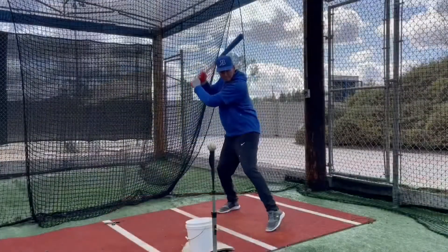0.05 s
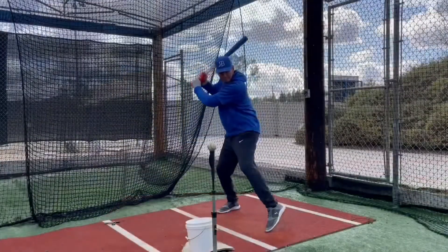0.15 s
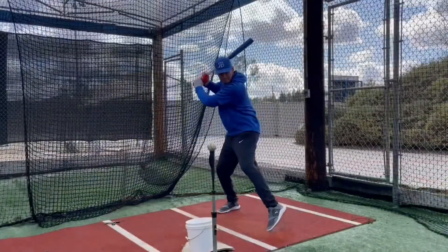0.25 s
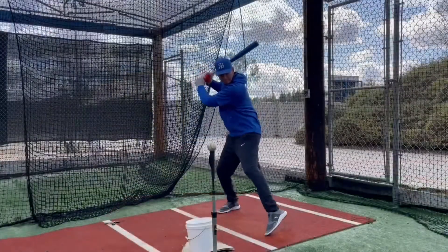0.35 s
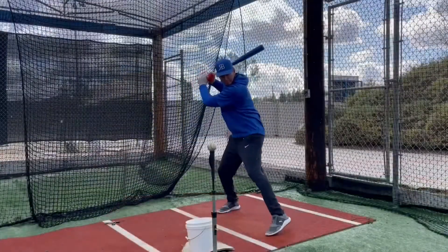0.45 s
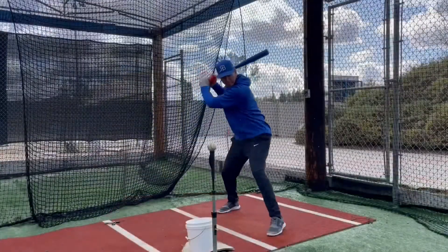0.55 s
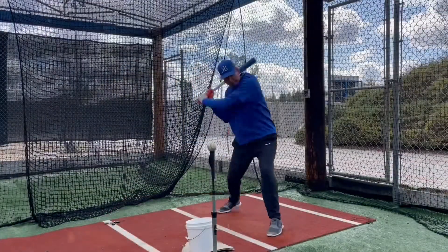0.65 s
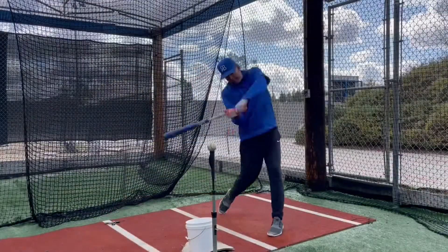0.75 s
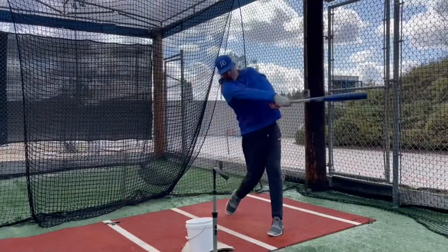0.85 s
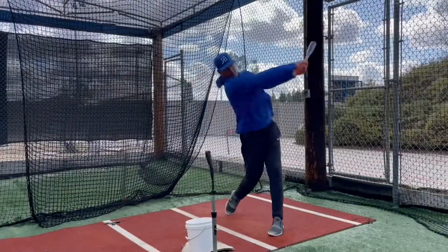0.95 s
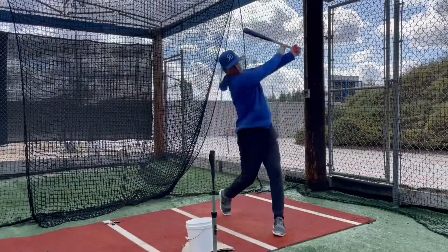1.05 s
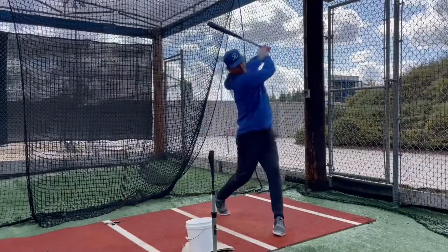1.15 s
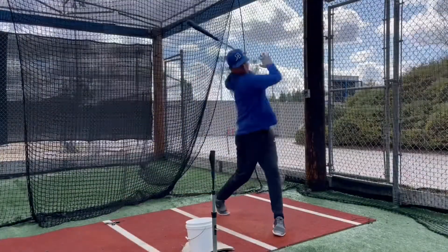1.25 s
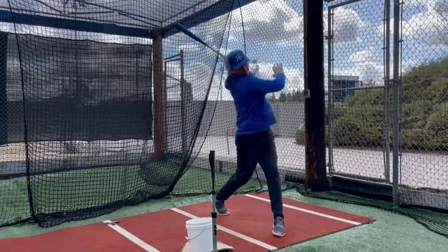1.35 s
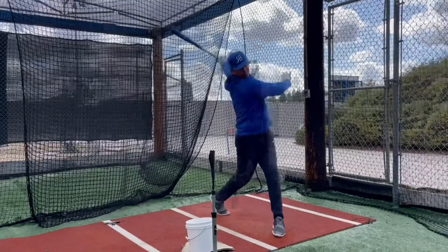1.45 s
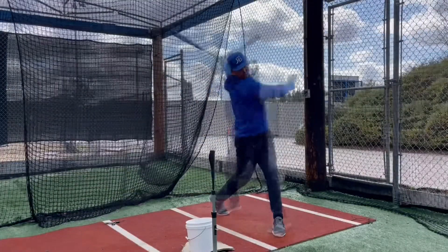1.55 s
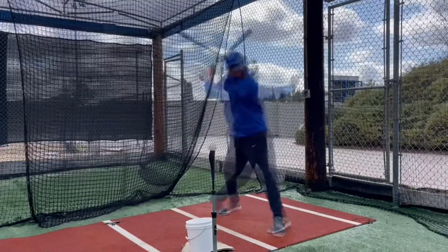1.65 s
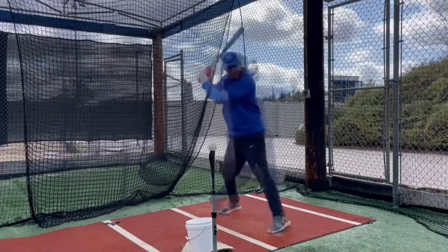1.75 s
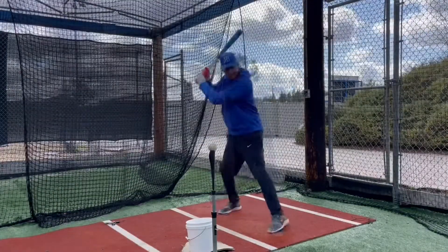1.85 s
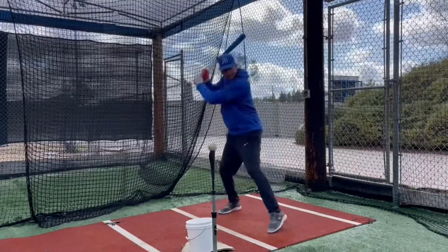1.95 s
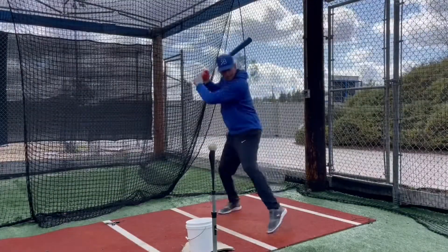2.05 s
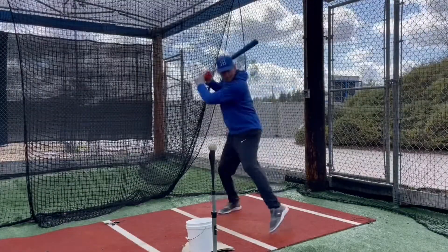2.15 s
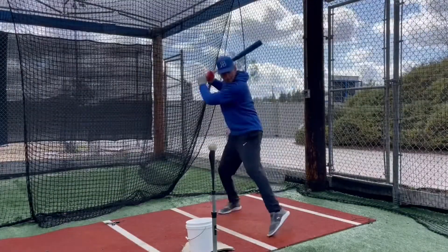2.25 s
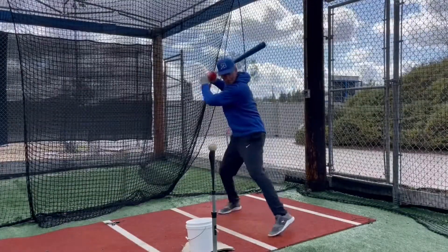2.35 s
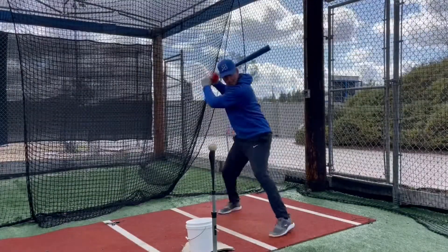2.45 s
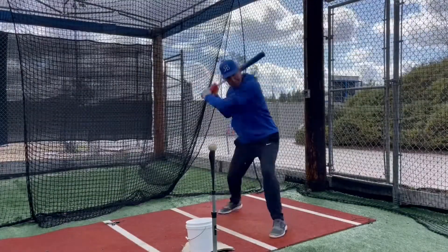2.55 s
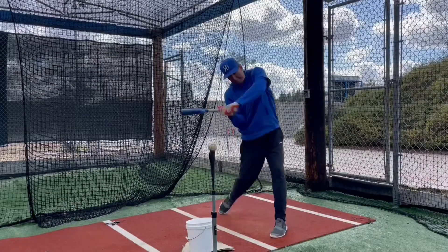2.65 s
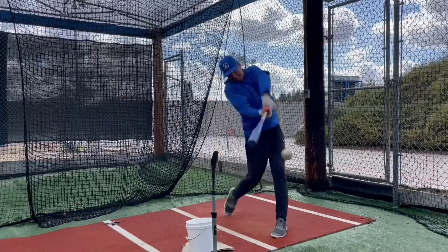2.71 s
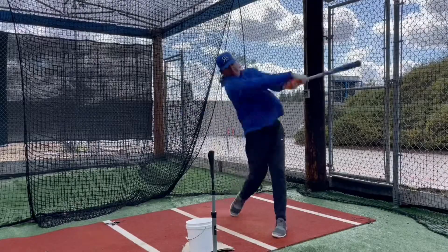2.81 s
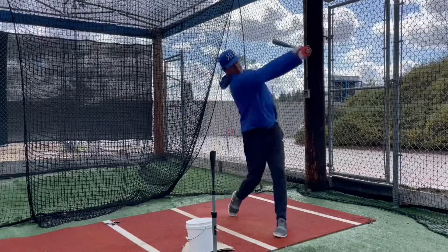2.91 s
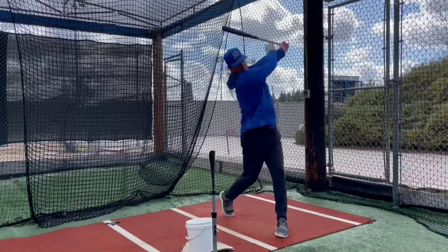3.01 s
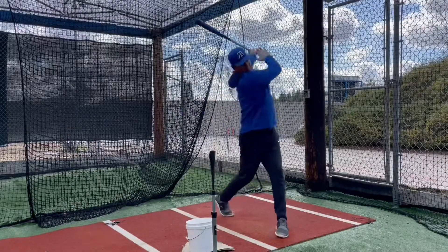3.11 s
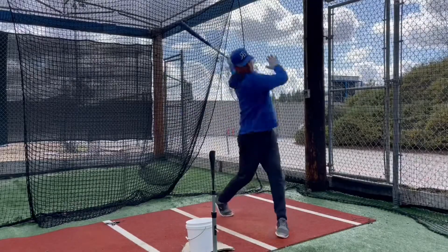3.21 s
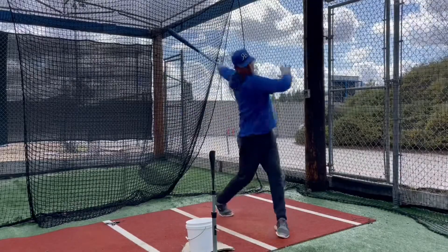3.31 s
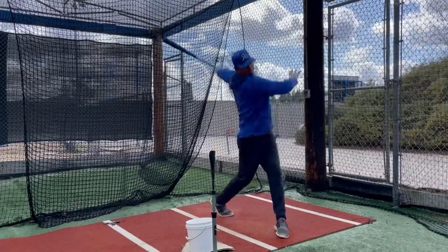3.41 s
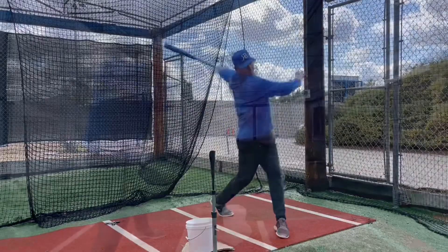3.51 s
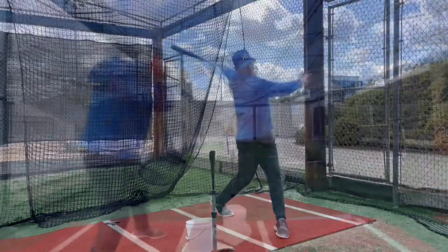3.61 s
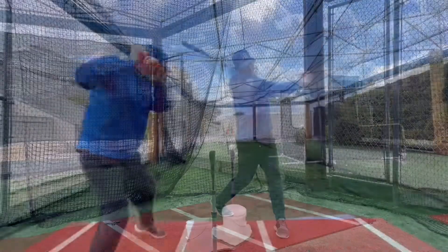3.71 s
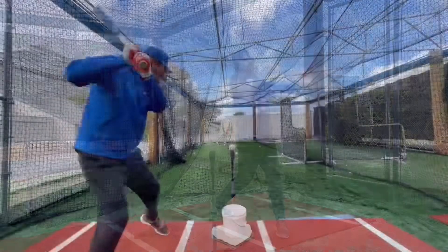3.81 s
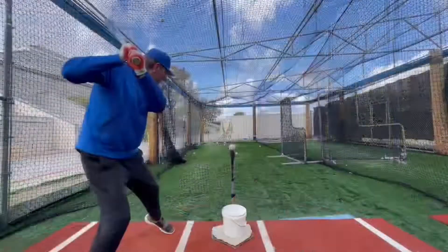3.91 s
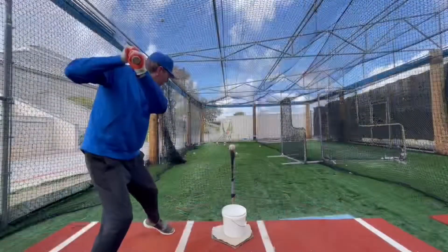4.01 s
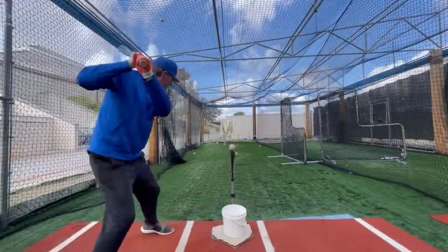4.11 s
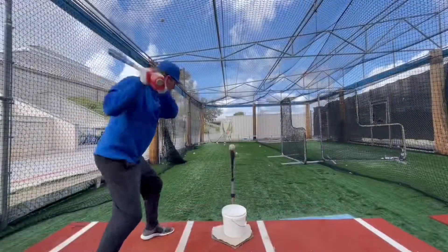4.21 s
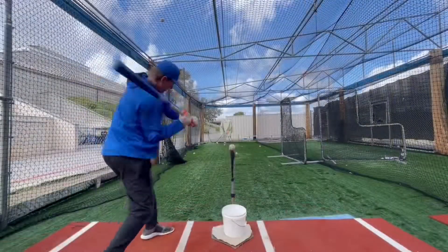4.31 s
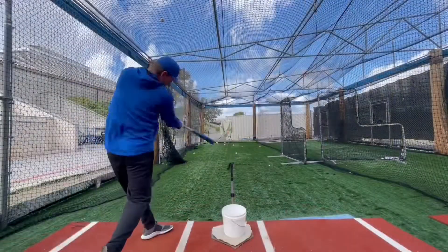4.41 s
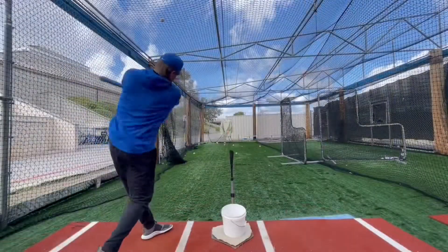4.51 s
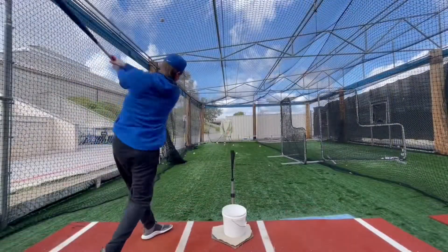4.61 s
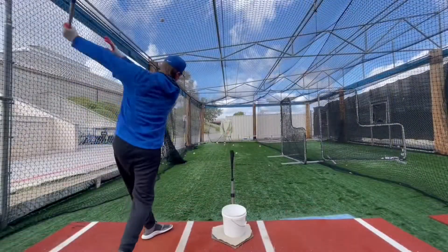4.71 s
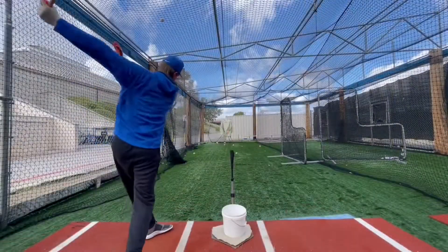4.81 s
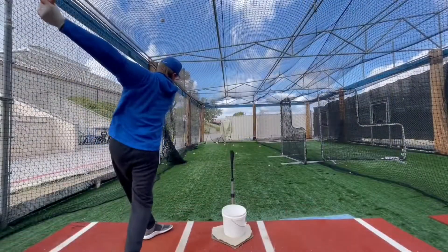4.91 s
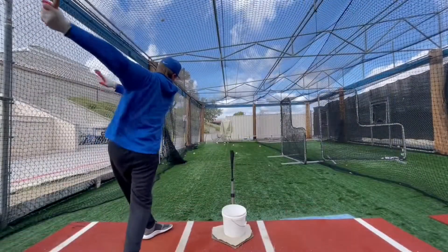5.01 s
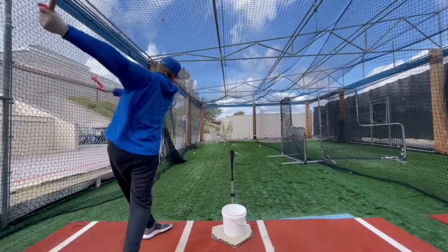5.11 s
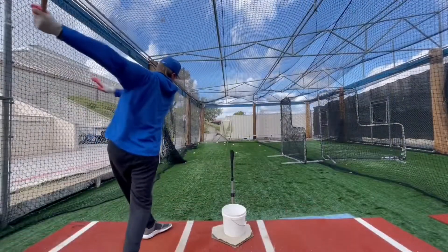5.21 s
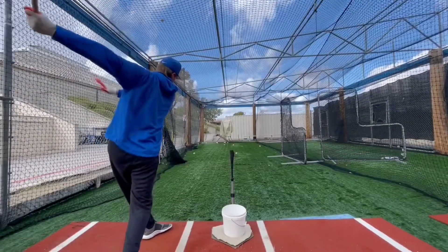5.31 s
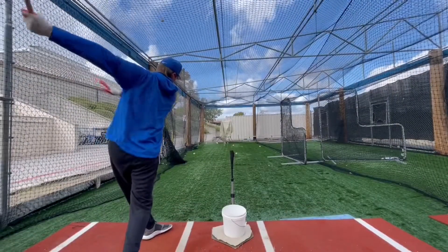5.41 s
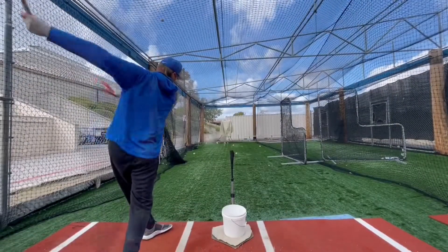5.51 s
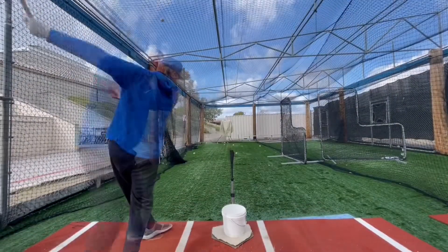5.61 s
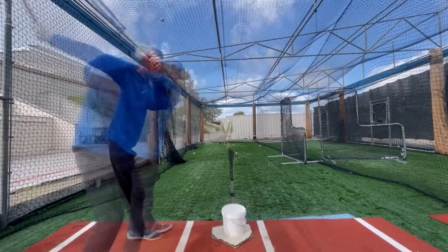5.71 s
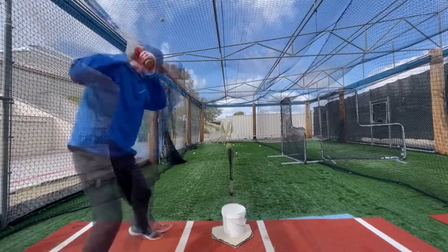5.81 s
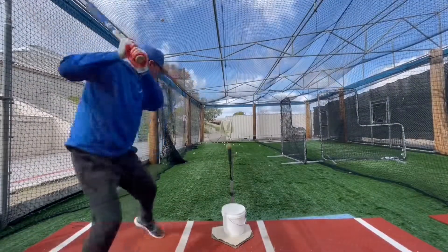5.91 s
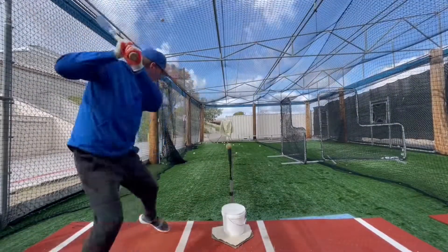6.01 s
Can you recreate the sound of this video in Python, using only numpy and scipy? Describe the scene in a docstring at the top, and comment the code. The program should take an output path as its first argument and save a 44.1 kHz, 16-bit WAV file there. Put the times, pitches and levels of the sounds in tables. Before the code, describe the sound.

Outdoors in a batting cage, a heavy bat cracks three balls off a tee, with netting clinks, jacket rustle, low wind rumble and distant traffic.

```python
"""Batting cage, three swings off a tee

Outdoors at the edge of a cage, a heavy bat knocks three baseballs off a tee: two heard from the side,
the last from close behind. Each crack is damped sines and noise, echoed by mat, walls and far yard.
Ringing clips and rubbing cords make the netting clink and rustle; shaped hiss makes the batter's jacket.
Filtered noise gives wind on the microphone and distant traffic; a far machine starts to hum near the end."""
import sys
import numpy as np
from scipy import signal
from scipy.fft import rfft, irfft
from scipy.io import wavfile
from scipy.ndimage import uniform_filter1d

SR = 44100
rng = np.random.default_rng(int(sys.argv[2]) if len(sys.argv) > 2 else 0)


def to_wav(sig):
    """Store sig (one row per channel, or 1-D mono) as 16-bit WAV at the path in sys.argv[1].

    Samples outside -1..1 are clipped; the rate is SR.
    """
    pcm = np.clip(np.atleast_2d(sig), -1, 1) * 32767
    pcm = np.round(pcm).astype(np.int16)
    wavfile.write(sys.argv[1], SR, pcm.T)  # frames by channels


N = 266845
T = np.arange(N) / SR
TOP_HZ = 16000

# colour of the distant traffic: (frequency [Hz], level [dB])
TRAFFIC_TONE = [(200, -6.5), (450, 1), (800, 4.5), (1200, -6.5), (2000, -20), (3500, -31), (8000, -60)]
# brief dips in the level of the distant wash: (time [s])
DIPS = [1.69, 3.71, 5.55]
# faint distant chirps: (time [s], length [s], starting pitch [Hz], ending pitch [Hz], level [dB])
CHIRPS = [(1.29, .028, 1745, 1775, -49.5), (1.304, .034, 930, 1010, -48), (1.314, .02, 2000, 2030, -57),
          (1.505, .016, 1730, 1720, -59), (1.54, .022, 1680, 1800, -59), (1.562, .022, 1810, 1720, -56),
          (1.595, .03, 1710, 1710, -62), (3.668, .065, 1600, 1600, -58.5), (3.675, .055, 2450, 2450, -62)]

# wind strength: (time [s], gust level [dB], low rumble level before RUMBLE_DB [dB])
WIND = [(0.0, -30.5, -46.5), (0.34, -33.5, -48.5), (0.89, -34.5, -55.5), (1.25, -32.5, -41.5),
        (1.74, -45, -57.5), (2.68, -56, -48.5), (3.15, -53, -50), (3.39, -50, -56), (3.74, -59, -68),
        (4.09, -54.5, -67), (4.45, -48.5, -72), (6.05, -56, -63.5)]
# colours of gust and low rumble: (frequency [Hz], level [dB])
GUST_TONE = [(60, -8.5), (115, 0), (190, -1), (300, -5.5), (450, -10), (700, -23.5), (1500, -48)]
RUMBLE_TONE = [(20, -43), (35, -10.5), (60, 0), (100, -1.5), (150, -7.5), (300, -23)]
# strongest buffets of air on the microphone: (time [s], peak level [dB], frequency [Hz])
BUFFETS = [(1.06, -32.5, 59), (1.314, -24, 98), (1.884, -34, 55.3), (1.981, -25, 59), (2.067, -25, 120),
           (2.101, -32, 54), (2.27, -26.5, 82), (2.537, -27.5, 78.8), (2.582, -26.5, 69),
           (2.662, -28.5, 84), (2.841, -27.5, 74.3), (2.99, -25.5, 71.4), (3.079, -33.5, 65),
           (3.268, -28, 97), (4.385, -30.5, 69)]

# hum lines of the far machine: (frequency [Hz], relative level [dB])
MACHINE_LINES = [(477, 0), (716, -13), (1432, -21.5), (1860, -24), (1910, -17.5)]
# the one surge of its hum: (time [s], length [s], rise [dB])
MACHINE_SURGE = (6.01, 0.042, 5.7)
# colour of its rush of air: (frequency [Hz], level [dB])
MACHINE_RUSH_TONE = [(400, 11.0), (650, 8), (1400, -4.0), (2000, 1.5), (2400, -5.5), (3000, -27)]

# colour of the batter's jacket: (frequency [Hz], level [dB])
JACKET_TONE = [(1200, 8.5), (2500, -1), (4200, -1.5), (6500, -4), (8500, -23), (10200, -11.5), (12500, -4),
               (15500, -16.5)]
# cloth rustles before, between and after the swings: (time [s], length [s], level [dB])
RUSTLES = [(0.07, .2, -76.5), (1.922, 0.16, -90), (3.72, 0.14, -65), (5.42, 0.14, -59.5),
           (5.699, 0.13, -62.5)]

# sharp, dry ticks: (time [s], peak level [dB], frequency [Hz])
TICKS = [(1.105, -32, 6300), (1.165, -34, 4300), (1.287, -46, 6330), (1.315, -44, 2900), (1.514, -50, 2850),
         (2.864, -35.5, 4300), (2.886, -35, 3900), (3.039, -36, 5700), (3.08, -34, 2850),
         (3.104, -39, 5800), (4.556, -31, 2480), (5.149, -42, 9800), (5.452, -42, 8500)]

# uneven, fading surges of the rubbing cords: (time [s], length [s], level before panning [dB])
RUB_SURGES = [(4.88, 0.042, -39), (4.969, 0.078, -44), (5.078, 0.066, -53.5), (5.142, .06, -51.5),
              (5.258, .08, -55)]
# colours of the rubbing cords and of the mesh sliding beneath them: (frequency [Hz], level [dB])
RUB_TONE = [(1300, -2), (2200, -2.5), (3400, 1), (5400, -3), (6800, -2), (9800, 0), (11000, -12),
            (15000, -21)]
MESH_TONE = [(1300, 0), (2200, 1), (3400, 1), (5400, -8.5), (6800, -5.5), (9800, -10.5), (15000, -24)]

# balls caught by the net: (time [s], level [dB], cord shake relative to it [dB])
CATCHES = [(1.048, -30, -13.5), (2.977, -26.5, -17)]
# quick clashes of the clips at each catch: (lag [s], level [dB], left minus right [dB])
CLASHES = [(0, -9, 8), (.003, -0.5, -5), (.010, -9, 4)]
# ringing clips and wires: (frequency [Hz], t60 [s], level in first catch [dB], in second [dB])
CLIP_MODES = [(1960, 0.049, -9, -11), (2420, 0.036, -10, -13), (2616, 0.05, -5.5, -5), (2970, 0.015, 0, -7),
              (3250, 0.015, 2, -8), (4250, .018, -19, -18), (5200, 0.04, -16, -7), (5940, 0.019, 1.5, 2),
              (6340, 0.043, -12, -4), (6510, 0.034, -3, -26), (13500, 0.0039, -4, -9)]
# colour of the shaking cords: (frequency [Hz], level [dB])
CORD_TONE = [(1200, -7.5), (2800, 5), (4500, 0), (6200, 2.5), (8500, -21), (12500, -9.5), (15000, -27)]

# swings: (time [s], heard from, strength [dB], thock frequency [Hz], thock level [dB], thock t60 [s],
# mat bounce lag [s], mat bounce level [dB], tee knock level [dB], left minus right [dB],
# cage level [dB], yard level [dB], stride before the hit [s], jacket level [dB])
SWINGS = [(0.7603, "side", 0.5, 589, -3, 0.018, 0.0018, 1.5, -10, -1, -20, -39, 0.44, -60.5),
          (2.693, "side", -3.5, 627, -1, 0.02, 0.001827, 5.5, -30, 0.5, -25, -39.5, 0.481, -62.5),
          (4.3953, "rear", -2.5, 984, 2.4, 0.0076, 0.0021, 5, -16, -2, -28, -38.5, 0.462, -56.5)]
# bat and ball ring; where the ball meets the barrel sets each mode's share:
# (frequency [Hz], t60 [s], level in first swing [dB], in second [dB], in third [dB])
BAT_MODES = [(530, 0.0024, -30, -14.5, -3.5), (730, 0.06, -13, -20, -45), (1022, 0.031, -9.5, -9, -18.5),
             (1097, 0.047, -22.5, -36.5, -28.5), (1634, 0.031, -16, -28.5, -15),
             (2080, 0.0065, -6.5, -4, -7.5), (2475, 0.0057, -19.5, -13.5, -10.5),
             (3616, 0.022, -17.5, -22.5, -23.5), (4530, 0.013, -24, -33.5, -24.5),
             (6850, 0.0015, -14, -10.5, -14)]
# echo paths off walls and posts: (heard from, lag [s], level relative to the crack [dB],
# nominal upper edge [Hz], left minus right [dB], dull ring relative to the slap [dB])
ECHOES = [("side", .014, -25, 8000, 0, -14), ("side", .0398, -14, 4300, 3, -8),
          ("side", .048, -24, 3000, -2, -8), ("side", .0665, -20.5, 3600, -4, -4),
          ("side", .088, -29, 3200, 3, -12), ("side", .098, -25.5, 4700, 0, -11),
          ("side", .138, -26, 2200, 2, -4), ("side", .153, -23, 5000, 0, -11),
          ("side", .193, -28, 2200, -2, -6), ("side", .207, -26, 2700, 0, -8),
          ("rear", .0272, -15, 2500, 3, -13), ("rear", .033, -22, 2600, -2, -12),
          ("rear", .0665, -24, 3000, 0, -16), ("rear", .0965, -25, 3500, -3, -22),
          ("rear", .1405, -25, 5500, 0, -22), ("rear", .158, -24, 3800, 2, -22),
          ("rear", .164, -26, 2600, -2, -12), ("rear", .1805, -22, 2600, 0, -13),
          ("rear", .1945, -22.5, 2200, 0, -10)]
# colours of the close scatter in the cage and of the yard's echo: (frequency [Hz], level [dB])
CAGE_TONE = [(250, -3.5), (700, 8.5), (1200, 1), (2200, 0), (4200, -8.5), (6500, -11), (9000, -28.5),
             (13000, -9), (15500, -19)]
YARD_TONE = [(200, -8), (550, 3.5), (850, 6.5), (1200, 5.5), (2200, 6), (4200, -3.5), (6500, -11),
             (9000, -31), (13000, -44), (15500, -39)]
# treble balance of the side and rear cracks: (frequency [Hz], level [dB])
TREBLE_BALANCE = {"side": [(20, 0), (2600, -0.5), (3400, -0.5), (7000, 1.5), (8300, -8), (10600, -4.5),
                  (12500, 0), (16000, -1)], "rear": [(20, -1), (2600, -0.5), (4000, 1), (5400, 3),
                  (6700, 4.5), (7800, -2), (9500, 4), (11500, 1.5), (13500, -3), (16000, 0)]}

# stereo width of the microphone pair: (frequency [Hz], side level [dB])
WIDTH_TONE = [(20, -3.5), (70, 5), (160, -2.5), (600, 6), (3000, -2), (8500, 3.5), (11500, 0.5),
              (16000, -13.5)]

# the distant traffic grows slightly fainter from REAR_START_S on, ahead of the third, rear-heard swing
TRAFFIC_DB, REAR_START_S, REAR_TRAFFIC_DB = -50.5, 3.48, -1.5
DIP_S, DIP_DB = 0.37, -3
# rumble relative to the wind curve; the rumble that stays in calm air
RUMBLE_DB, CALM_RUMBLE_DB = 6.5, -54.5
BUFFET_CYCLES = 1.93
# the far machine starts up, then keeps swelling while its hum throbs unevenly
MACHINE_START_S, MACHINE_RISE_S, MACHINE_DB, MACHINE_DB_PER_S = 5.53, 0.075, -51.5, 18
MACHINE_THROB_DB = 2.5
# every swing runs alike: a shoe scuffs, the body coils, the arms whip through, the jacket settles;
# step, whip and settle levels are relative to the jacket
STEP_DB, STEP_T60_S = -1.5, 0.17
COIL_LEAD_S, COIL_S = 0.14, 0.23
WHIP_S, WHIP_DB = 0.077, 11.5
SETTLE_DB, SETTLE_T60_S, CLOTH_REST_DB = 4.5, 2.49, -76
# from close behind, the jacket's fine hiss carries too
CLOSE_HISS_DB = -9
# the side net snaps taut after the last swing, slides and flaps; later a soft swish follows
SNAP_S, SNAP_DB = 4.854, -23
RUB_DB, RUB_T60_S = -46.5, 2.32
FLAP_DB, FLAP_T60_S = -43, 2.54
SWISH_S, SWISH_LENGTH_S, SWISH_DB, SWISH_CORD_DB = 5.38, 0.085, -43, -55
# each slap has a slightly different dull ring; the spread is in log frequency
SLAP_RING_HZ, SLAP_RING_SPREAD = 920, .16
# the yard's echo builds, holds while the far fences answer, then dies away
YARD_RISE_S, YARD_HOLD_S, YARD_T60_S = .02, 0.14, 1
# seen down the lane, the end wall adds a grainy swell
END_WALL_LAG_S, END_WALL_S, END_WALL_DB = 0.19, 0.16, -43.5
# the crack's body reaches the left port this much before the right
PORT_LAG_S = .00005


def undb(db):
    """Decibels to gain."""
    return 10 ** (np.asarray(db) / 20)


def unit(x):
    """Scale to rms 1."""
    return x / np.sqrt(np.mean(x ** 2))


def fader(rows, axis=1):
    """Gain over time from one dB column of a curve."""
    rows = np.array(rows)
    return undb(np.interp(T, rows[:, 0], rows[:, axis]))


def pan(db):
    """Left and right gains for a level difference."""
    return undb(np.array([[db], [-db]]) / 2)


def colour(x, tone):
    """Filter by (frequency [Hz], level [dB]) points, falling steeply past both ends."""
    hz, db = np.transpose(tone)
    octave = np.log2(np.fft.rfftfreq(x.shape[-1], 1 / SR) + 1)
    below = np.maximum(np.log2(hz[0]) - octave, 0)
    above = np.maximum(octave - np.log2(hz[-1]), 0)
    gain = undb(np.interp(octave, np.log2(hz), db) - 20 * (below + above))
    return irfft(rfft(x) * gain, x.shape[-1])


def band(x, lo_hz, hi_hz):
    """Causal band-pass, its upper edge held to TOP_HZ."""
    return signal.sosfilt(signal.butter(2, [lo_hz, min(hi_hz, TOP_HZ)], "band", fs=SR, output="sos"), x)


def noise(width):
    """Stereo noise; width is the side signal relative to the middle."""
    mid, side = rng.standard_normal((2, N))
    return unit(np.array([mid + width * side, mid - width * side]))


def walk(rate):
    """Slow random drift with a spread near 1; rate is in steps per second."""
    k = max(int(SR / rate), 1)
    steps = np.repeat(rng.standard_normal(N // k + 1), k)
    return unit(uniform_filter1d(uniform_filter1d(steps, k), k)[:N])


def hump(s, length):
    """A smooth swell centred on s."""
    return np.exp(-(2 * (T - s) / length) ** 2)


def envelope(s, rise, t60, hold=0):
    """Rises from s, stays level until hold seconds after s, then dies away."""
    decay = undb(-60 * np.maximum(T - s - hold, 0) / t60)
    return np.clip((T - s) / rise, 0, 1) * decay


def fade(t60):
    """Exponential decay, half a second long."""
    return undb(-60 * T[:SR // 2] / t60)


def burst(t60, width=1):
    """A dying puff of stereo noise."""
    return noise(width)[:, :SR // 2] * fade(t60)


def ring(modes, lag_cycles=0):
    """Damped sines; each may start some of its own cycles late, so that the low ones come last."""
    out = 0
    for hz, db, t60 in modes:
        age = np.maximum(T[:SR // 2] - lag_cycles / hz, 0)
        out = out + undb(db - 60 * age / t60) * np.sin(2 * np.pi * hz * age)
    return out


def late(x, s):
    """The sound delayed by s seconds, on the full time line."""
    start = max(int(round(s * SR)), 0)
    return np.pad(x, [(0, 0)] * (x.ndim - 1) + [(start, N)])[..., :N]


def rattle(width):
    """Countless small echoes: each frequency band comes in its own irregular clumps."""
    edges_hz = [200, 700, 1300, 2200, 3500, 5500, 15500]
    out = 0
    for lo, hi in zip(edges_hz, edges_hz[1:]):
        clumps = undb(2.1 * walk(260) + 2.6 * walk(1100))
        out = out + band(noise(width) * clumps, lo, hi)
    return out


def distance():
    """Far off: a wash of traffic noise and a few thin, blurred chirps that glide a little."""
    rear = np.clip((T - REAR_START_S) / 0.26, 0, 1)
    dips = sum(hump(s, DIP_S) for s in DIPS)
    traffic_db = TRAFFIC_DB + REAR_TRAFFIC_DB * rear + DIP_DB * dips
    out = unit(colour(noise(width=0.7), TRAFFIC_TONE)) * undb(traffic_db + 0.43 * walk(3.3))
    flutter = undb(3 * walk(180))
    waver = 1 + .04 * walk(900) + .008 * walk(90)
    for s, length, start_hz, end_hz, db in CHIRPS:
        swell = envelope(s, length / 2, t60=0.13, hold=length) * flutter
        pitch = np.interp(T, [s, s + length], [start_hz, end_hz]) * waver
        out = out + undb(db) * swell * np.sin(2 * np.pi * np.cumsum(pitch) / SR)
    return out


def machine():
    """A far machine whose wavering hum swells with a rush of air."""
    age = T - MACHINE_START_S
    surge_s, surge_length, surge_db = MACHINE_SURGE
    effort = np.clip(age / MACHINE_RISE_S, 0, 1) * undb(MACHINE_DB + MACHINE_DB_PER_S * age)
    hum = 0
    for hz, db in MACHINE_LINES:
        throb = undb(db + MACHINE_THROB_DB * walk(55))
        pitch = hz * (1 + .013 * walk(90))
        hum = hum + throb * np.sin(2 * np.pi * np.cumsum(pitch) / SR)
    rush = unit(colour(noise(width=1.0), MACHINE_RUSH_TONE))
    return effort * (hum * undb(surge_db * hump(surge_s, surge_length)) + undb(-4) * rush)


def wind():
    """Turbulence at the microphone: a restless rumble and single lumpy buffets."""
    gust = unit(colour(noise(width=0.41), GUST_TONE)) * fader(WIND) * undb(1.4 * walk(14))
    pressure = fader(WIND, axis=2) * undb(RUMBLE_DB + 3.1 * walk(14)) + undb(CALM_RUMBLE_DB)
    rumble = unit(colour(noise(width=0.293), RUMBLE_TONE)) * pressure
    eddies = unit(band(noise(width=0.92), lo_hz=87, hi_hz=183.6))
    out = gust + rumble
    for s, db, hz in BUFFETS:
        push = np.cos(2 * np.pi * hz * (T - s)) + undb(-11.0) * eddies
        out = out + undb(db) * hump(s, BUFFET_CYCLES / hz) * push
    return out


def batter():
    """Cloth slips in tiny catches as the batter steps, coils, swings and settles."""
    cloth = unit(colour(noise(width=0.82) * undb(2 * walk(270)), JACKET_TONE))
    hiss = band(noise(width=1.0), lo_hz=8050, hi_hz=10200)
    hiss = unit(band(hiss, lo_hz=8050, hi_hz=10200))  # a second pass steepens the edges
    cloth = cloth + undb(CLOSE_HISS_DB) * hiss * np.clip((T - REAR_START_S) / 0.33, 0, 1)
    sole = unit(band(noise(width=1.0), lo_hz=4500, hi_hz=15400))
    motion = undb(CLOTH_REST_DB) + sum(undb(db) * hump(s, length) for s, length, db in RUSTLES)
    steps = 0
    for s, *_, stride_s, jacket_db in SWINGS:
        coil = hump(s - COIL_LEAD_S, COIL_S)
        whip = undb(WHIP_DB) * hump(s, WHIP_S)
        settle = undb(SETTLE_DB) * envelope(s, .02, SETTLE_T60_S)
        motion = motion + undb(jacket_db) * (coil + whip + settle)
        steps = steps + undb(jacket_db + STEP_DB) * envelope(s - stride_s, 0.0037, STEP_T60_S)
    return cloth * motion + sole * steps


def ticks():
    """Taps of the netting and a few crisp echoes of the cracks: short noise with a brief wiry ring."""
    out = 0
    for s, db, hz in TICKS:
        tap = band(burst(t60=0.034), hz / 1.33, hz * 1.03)
        wire = ring([(hz, 0, .05), (hz * .91, -2, .04)])
        tap = tap / np.abs(tap).max() + undb(-10) * wire
        out = out + late(undb(db) * tap / np.abs(tap).max(), s)
    return out


def side_net():
    """The net snaps, its cords rub in fading surges while the mesh slides and flaps; later a soft swish
    follows."""
    snap = band(burst(t60=0.021, width=1.0), lo_hz=1390, hi_hz=3650)
    grain = undb(2.2 * walk(500) + .8 * walk(45))
    cord = unit(colour(noise(width=0.9) * grain, RUB_TONE))
    mesh = unit(colour(noise(width=0.97) * grain, MESH_TONE))
    flap = unit(band(noise(width=1.07), lo_hz=270, hi_hz=1010))
    swish = hump(SWISH_S, SWISH_LENGTH_S)
    rubbing = sum(undb(db) * hump(s, length) for s, length, db in RUB_SURGES)
    sliding = undb(RUB_DB) * envelope(SNAP_S, 0.019, RUB_T60_S) + undb(SWISH_CORD_DB) * swish
    flapping = undb(FLAP_DB) * envelope(SNAP_S, 0.012, FLAP_T60_S) + undb(SWISH_DB) * swish
    rustle = cord * rubbing + mesh * sliding + flap * flapping
    return pan(4.8) * (rustle + undb(SNAP_DB) * late(snap / np.abs(snap).max(), SNAP_S))


def net():
    """The net catches a ball and snaps taut: clips clash in a tight cluster, then the cords shake out."""
    out = 0
    cords = unit(colour(rattle(width=0.9), CORD_TONE))
    for catch, (s, db, shake_db) in enumerate(CATCHES):
        clink = undb(1.5) * late(band(burst(t60=0.13, width=1.0), lo_hz=1630, hi_hz=6200), 0)
        for lag, clash_db, pan_db in CLASHES:
            # every clash strikes the clips at slightly different pitches
            detune = 1 + .012 * rng.standard_normal(len(CLIP_MODES))
            modes = [(hz * d, levels[catch], t60) for d, (hz, t60, *levels) in zip(detune, CLIP_MODES)]
            clink = clink + undb(clash_db) * pan(pan_db) * late(ring(modes), lag)
        clink = late(band(clink, lo_hz=1520, hi_hz=13700), s)
        shake = cords * late(fade(t60=0.76), s)
        out = out + undb(db) * (clink + undb(shake_db) * shake)
    return out


def slaps(place):
    """Single reflections of a crack, thinned and slightly smeared by rough surfaces."""
    out = 0
    for echo_place, lag, db, edge_hz, pan_db, ring_db in ECHOES:
        if echo_place == place:
            slap = band(burst(t60=.011, width=.7), 1000, 1.15 * edge_hz)
            slap = band(slap, 500, 1.25 * edge_hz)
            slap = band(slap, 300, 1.4 * edge_hz)
            ring_hz = SLAP_RING_HZ * np.exp(SLAP_RING_SPREAD * rng.standard_normal())
            dull = ring([(ring_hz, 0, .02)])
            slap = slap[:, :SR // 10] + undb(ring_db) * dull[:SR // 10]
            out = out + late(undb(db) * pan(pan_db) * slap / np.abs(slap).max(), lag)
    return out


def balance_treble(x, place):
    """Filter the middle signal with the treble curve of the side or rear cracks; the sides stay as they are."""
    mid = x.mean(axis=0)
    return x - mid + colour(mid, TREBLE_BALANCE[place])


def crack(swing, thock_hz, thock_db, thock_t60, mat_s, mat_db, tee_db):
    """Bat meets ball: the air is squeezed out in a snap, both ring briefly, and the mat throws it back."""
    hiss = burst(t60=0.009, width=.6)
    snap = undb(-16.5) * band(hiss, lo_hz=2800, hi_hz=6700)
    snap = snap + undb(-12.5) * band(hiss, lo_hz=10330, hi_hz=14600)
    modes = [(hz, levels[swing], t60) for hz, t60, *levels in BAT_MODES]
    # bending waves run faster at high pitch: the crack sweeps downwards
    body = -ring(modes, lag_cycles=0.53)
    # adding the slope on the left and taking it off on the right shifts the two in time
    port_shift = np.array([[1], [-1]]) * np.gradient(body) * PORT_LAG_S * SR / 2
    direct = late(snap + body + port_shift, 0)
    # the low thock radiates downwards, so it arrives with the bounce
    thock = late(-ring([(thock_hz, thock_db, thock_t60)], lag_cycles=0.12), 0)
    # the barrel goes on into the rubber tee for a second, dull knock
    thock = thock + undb(tee_db) * late(thock, 0.00386)
    bounce = undb(mat_db) * band(direct, lo_hz=1200, hi_hz=13920) + thock
    # so thin a body radiates little bass
    return band(direct + late(bounce, mat_s), lo_hz=146, hi_hz=15400)


def batting():
    """Three cracks; each sets off a quick scatter in the cage, single slaps and a grainy wash from the yard."""
    cage = unit(colour(noise(width=0.37) * undb(2 * walk(650)), CAGE_TONE))
    yard = unit(colour(rattle(width=1.27), YARD_TONE))
    wall = unit(band(rattle(width=0.77), lo_hz=600, hi_hz=3680))
    out = 0
    for swing, (s, place, db, *contact, pan_db, cage_db, yard_db, _, _) in enumerate(SWINGS):
        # contact holds the thock, mat and tee columns
        blow = pan(pan_db) * crack(swing, *contact)
        out = out + undb(db) * balance_treble(late(blow + slaps(place), s), place)
        out = out + undb(cage_db) * cage * late(fade(t60=0.075), s + 0.008)
        out = out + undb(yard_db) * yard * envelope(s, YARD_RISE_S, YARD_T60_S, YARD_HOLD_S)
        if place == "rear":
            out = out + undb(END_WALL_DB) * wall * hump(s + END_WALL_LAG_S, END_WALL_S)
    return out


def scene():
    """Everything heard from the edge of the cage, the far sounds first."""
    return distance() + machine() + wind() + batter() + ticks() + side_net() + net() + batting()


def record(dry):
    """The microphone pair shapes the width; the ends fade, the highest peaks are rounded, the top is cut."""
    mid = dry.mean(axis=0)
    side = colour((dry[0] - dry[1]) / 2, WIDTH_TONE)
    ends = np.minimum(np.minimum(T, T[-1] - T) / .005, 1)
    opened = np.array([mid + side, mid - side]) * ends
    rounded = opened / (1 + (opened / .9) ** 6) ** (1 / 6)
    return signal.sosfilt(signal.ellip(10, .2, 90, TOP_HZ, fs=SR, output="sos"), rounded)


dry = scene()
out = record(dry)
to_wav(out)
```